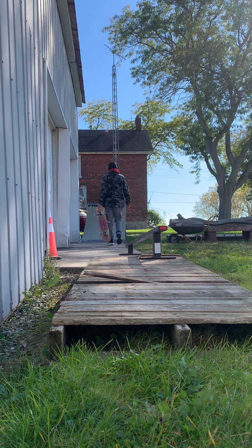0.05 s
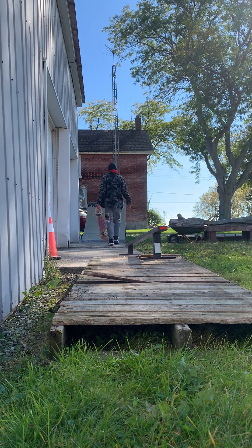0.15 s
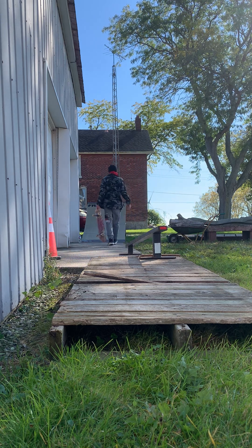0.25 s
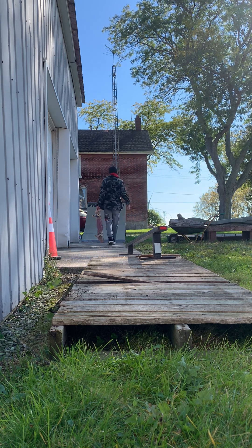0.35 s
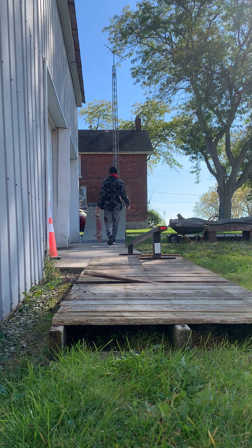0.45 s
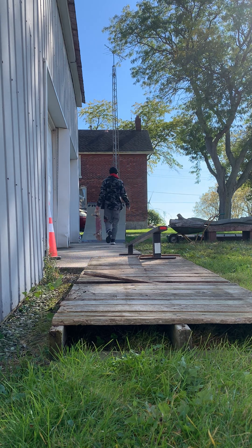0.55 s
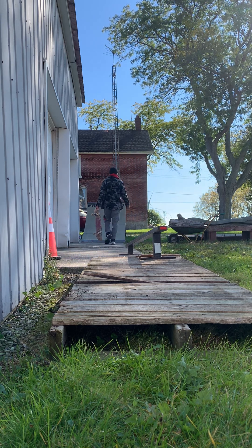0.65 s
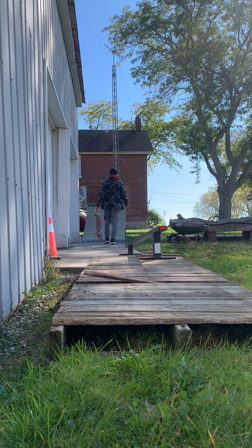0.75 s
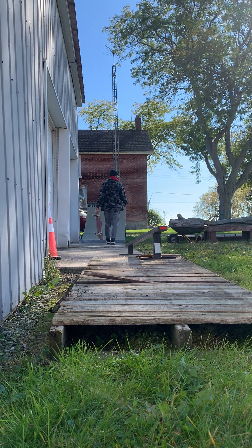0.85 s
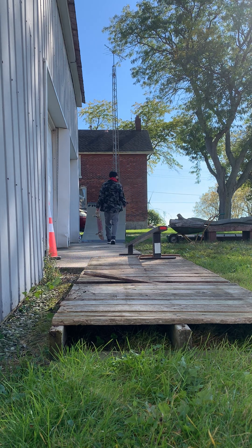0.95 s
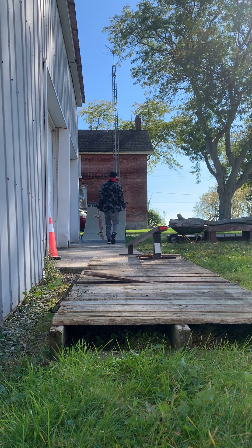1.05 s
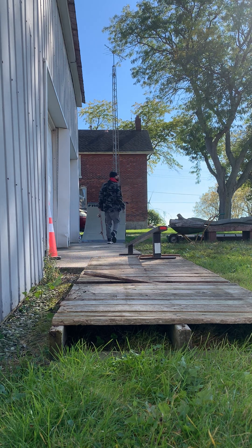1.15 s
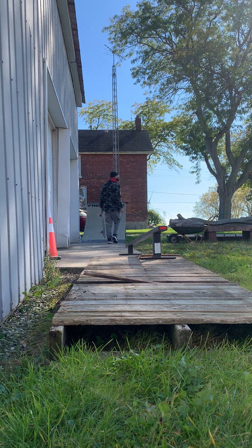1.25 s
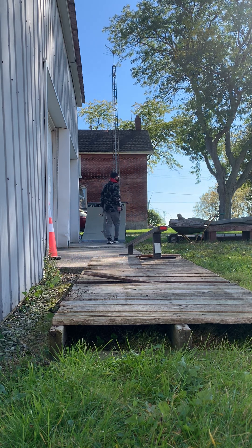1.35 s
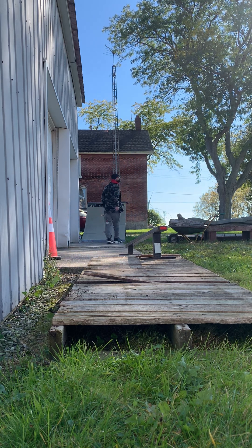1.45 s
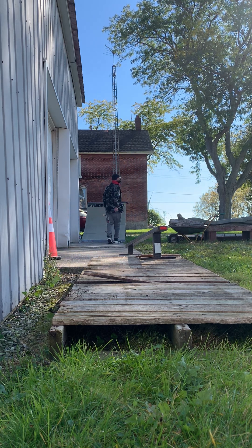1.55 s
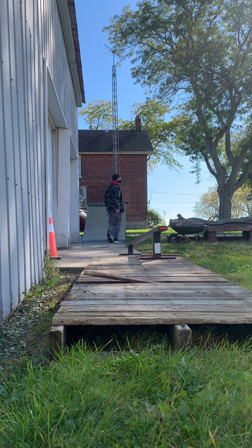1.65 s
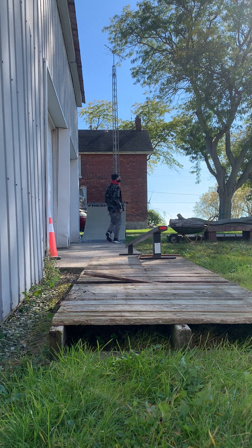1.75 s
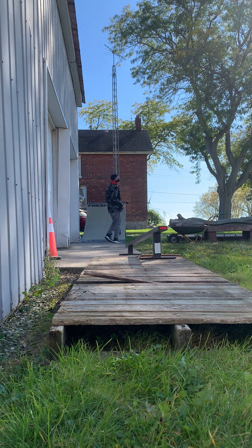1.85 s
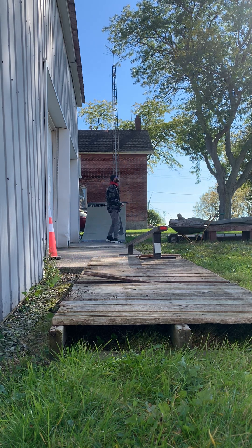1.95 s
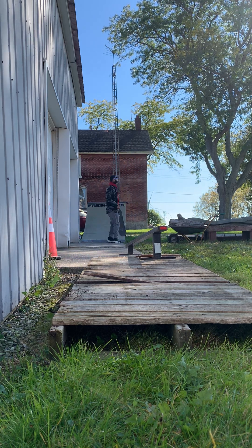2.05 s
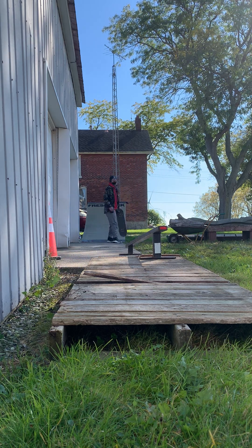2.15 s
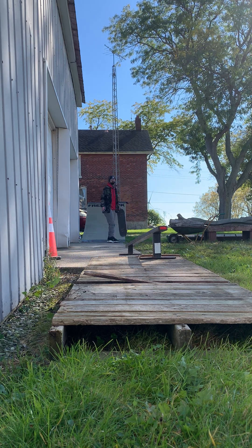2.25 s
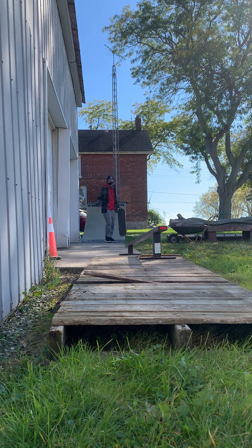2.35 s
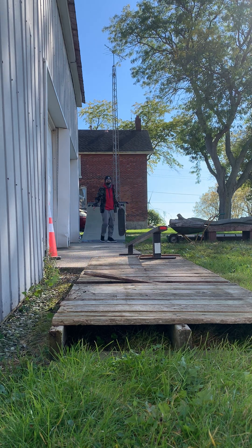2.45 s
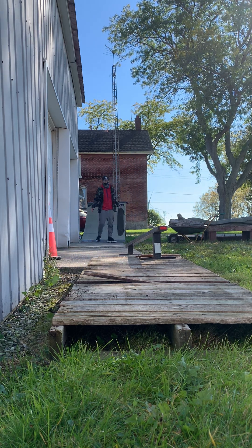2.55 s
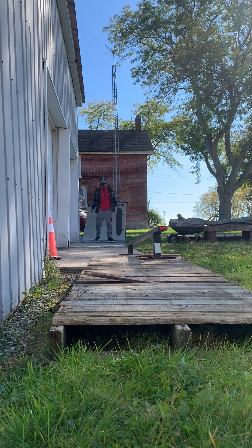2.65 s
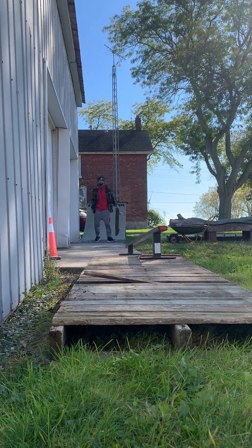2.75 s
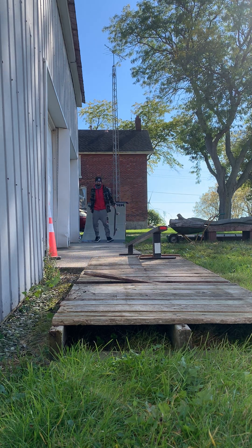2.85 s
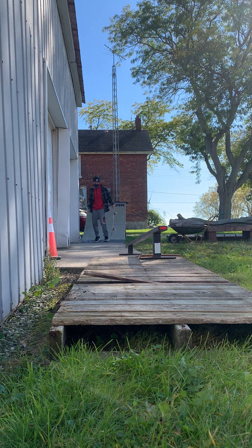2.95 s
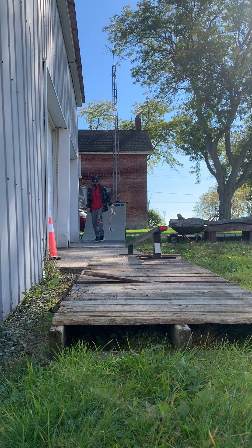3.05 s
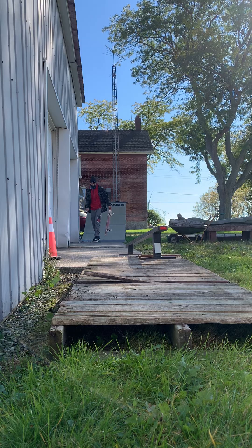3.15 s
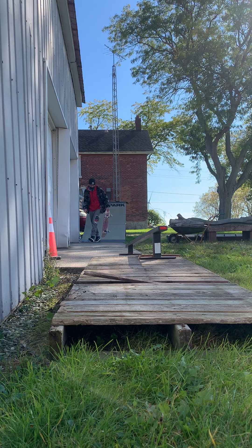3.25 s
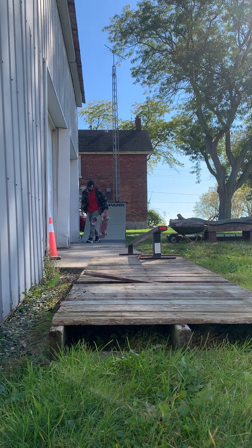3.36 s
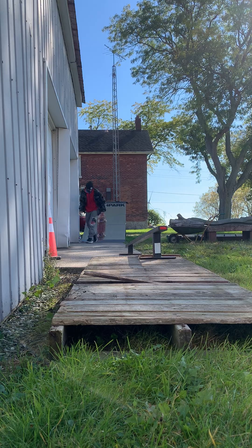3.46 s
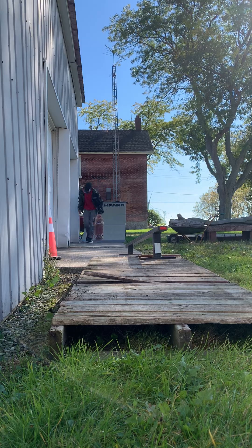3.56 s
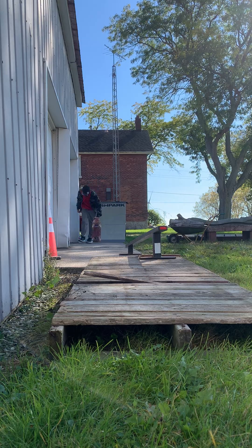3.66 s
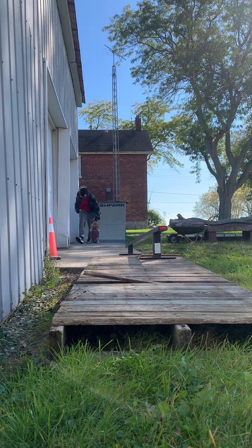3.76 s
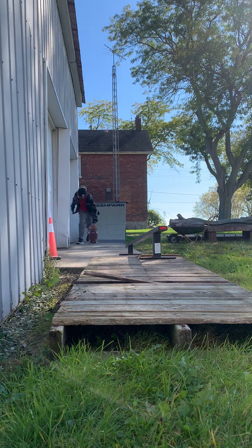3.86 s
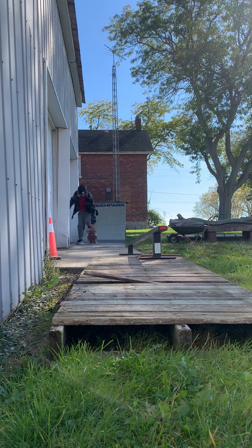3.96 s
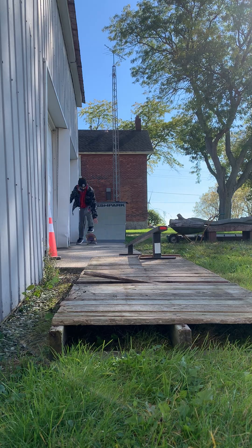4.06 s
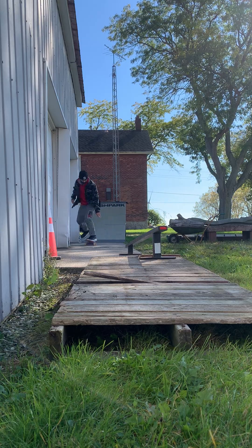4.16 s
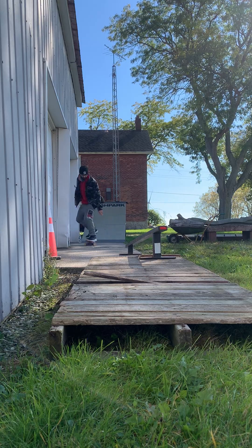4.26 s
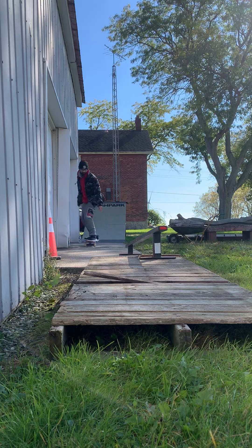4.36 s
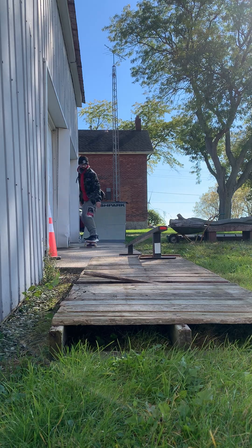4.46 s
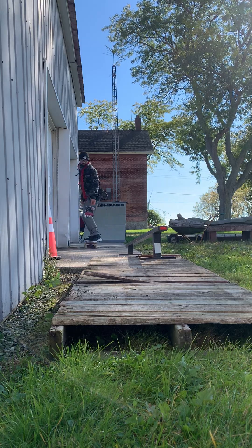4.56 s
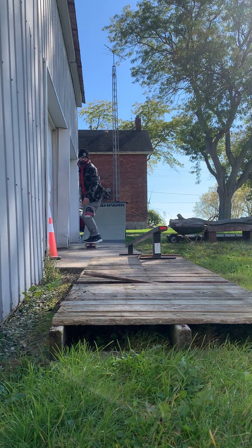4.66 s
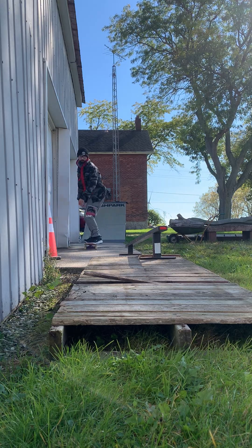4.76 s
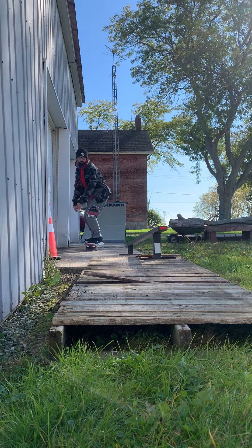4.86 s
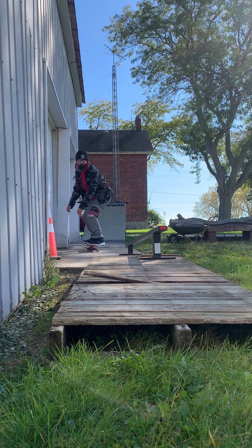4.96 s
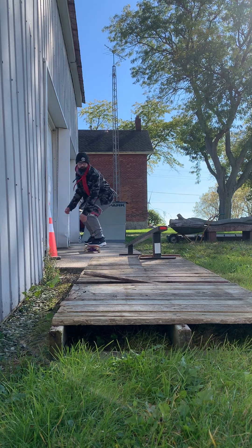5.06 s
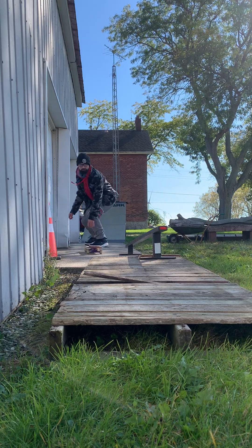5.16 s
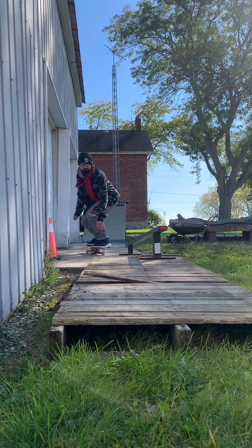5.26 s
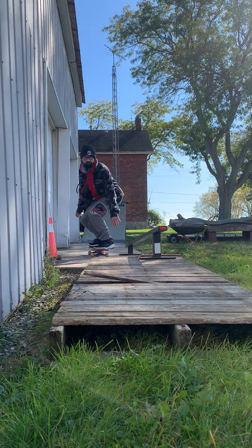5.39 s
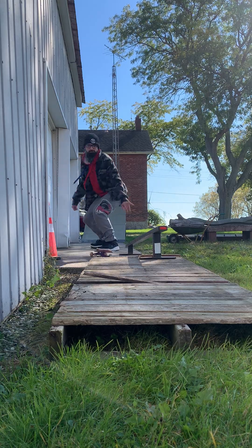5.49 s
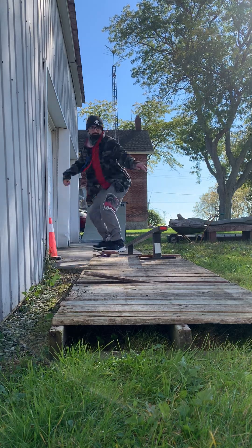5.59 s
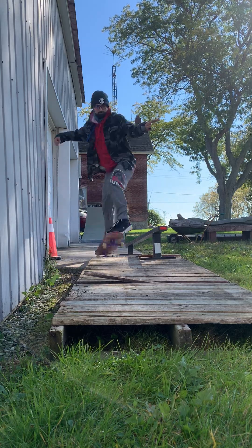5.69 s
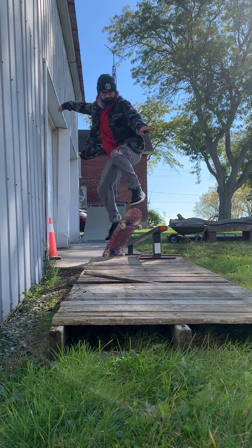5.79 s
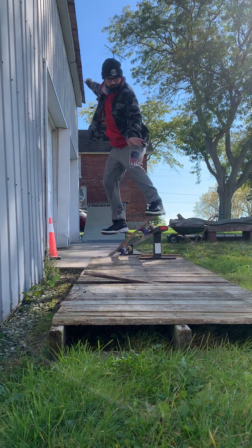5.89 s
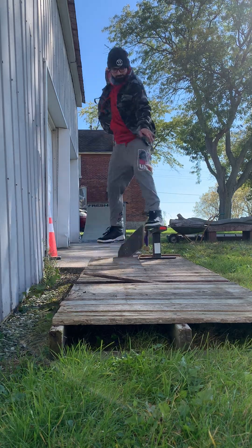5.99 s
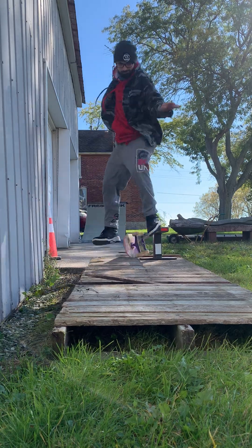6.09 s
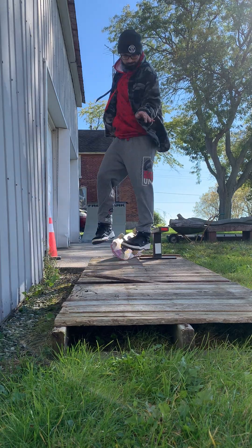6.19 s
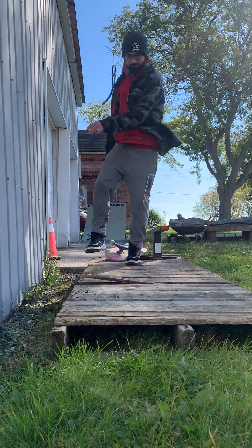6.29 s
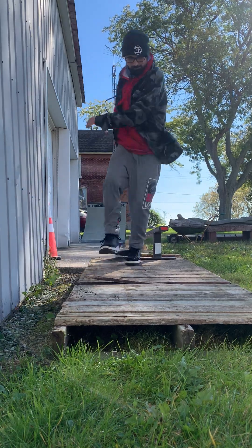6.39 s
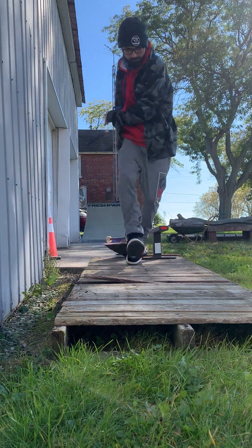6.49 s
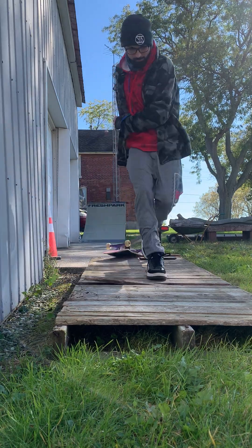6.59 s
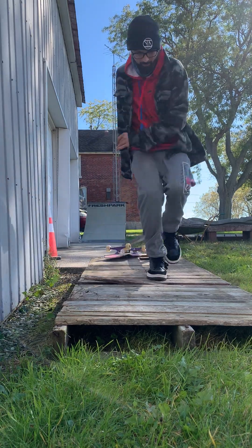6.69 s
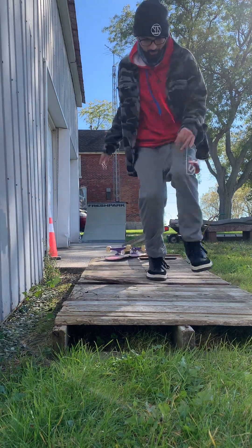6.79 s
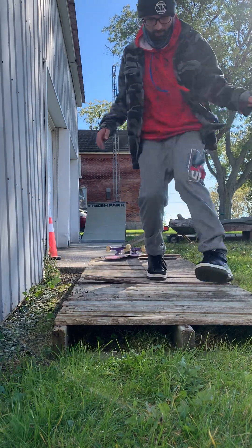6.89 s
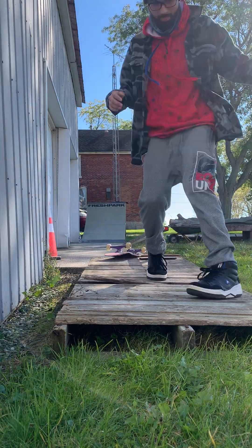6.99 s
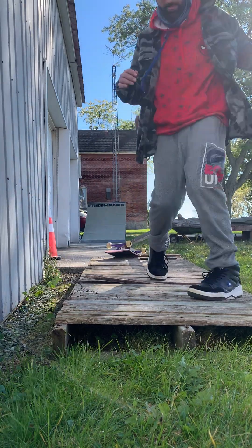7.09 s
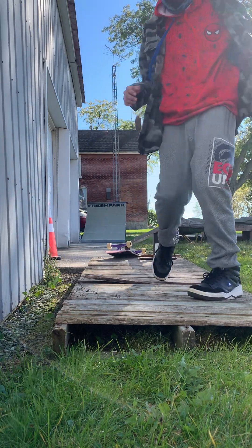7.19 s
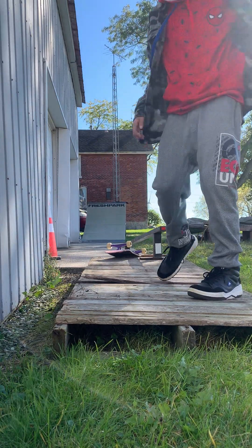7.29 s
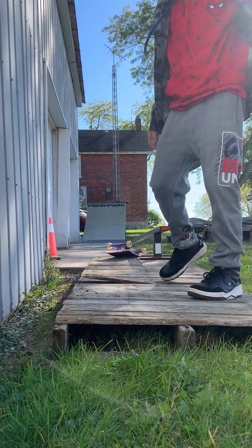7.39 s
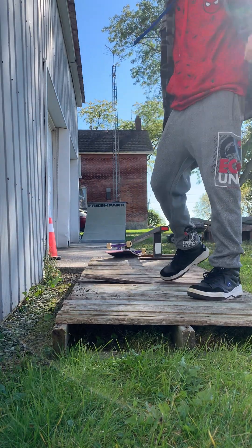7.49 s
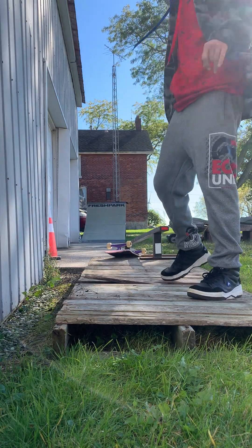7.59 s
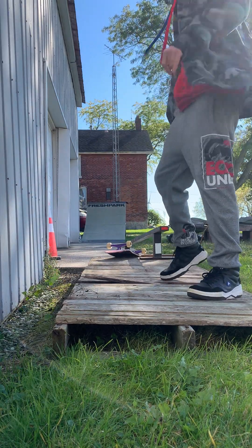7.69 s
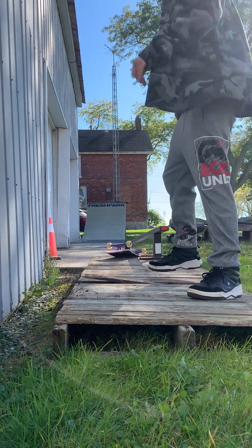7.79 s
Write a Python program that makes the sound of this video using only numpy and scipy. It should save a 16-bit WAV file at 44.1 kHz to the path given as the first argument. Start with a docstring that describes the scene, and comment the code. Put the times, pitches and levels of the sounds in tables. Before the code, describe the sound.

A ground-level phone outdoors picks up faint hiss, distant leaf rustle, nearly inaudible insect chirps and light wind, with soft low puffs around 1.2 to 2.7 seconds; the background shifts between muffled and open. A tiny knock comes at 2.8, then wooden taps at 3.7 to 4.0 and firmer knocks at 4.2, 4.35, 4.5 and 4.7. From about 3.9 hard wheels roll over gritty ground, with bearing hiss and a hollow deck drone growing nearer; a wind thump lands at 4.8. At 5.8 a sharp double crack pops the board, and the loudest crack hits at 5.9 with a touch of metal. More blows follow at 6.0 and 6.15. At 6.3 to 6.5 the board slams and clangs, rattling and scraping on a hollow steel rail. Loose knocks and strong wind thumps follow to 6.9, faint taps at 7.0 to 7.1, then wind fades by 7.8.

```python
"""A skateboard trick on a steel rail

Wind turbulence, puffs, rustle and chirps accompany a skateboard that rolls up to a phone on the ground by a shed,
flips, lands and clangs on a rail. Filtered noise forms wind, rustle, chirps and wheels; gliding sines form puffs.
Noise bursts excite damped resonances of the deck and of the rail. Rolling, rail, wind, rustle and chirps
switch between full and muffled below 8 kHz; blows, puffs and hiss are never muffled. The mono sum is widened.
"""
import sys
import numpy as np
from scipy import signal
from scipy.fft import rfft, irfft, next_fast_len
from scipy.io import wavfile
from scipy.ndimage import uniform_filter1d

SR = 44100
rng = np.random.default_rng(int(sys.argv[2]) if len(sys.argv) > 2 else 0)


def file_out(sig):
    """Save sig as 16-bit WAV at sys.argv[1]."""
    # one column per channel
    cols = np.atleast_2d(sig).T
    # limit, then scale
    lim = np.clip(cols, -1, 1)
    pcm = np.round(lim * 32767).astype(np.int16)
    wavfile.write(sys.argv[1], SR, pcm)


N = 345527
T = np.arange(N) / SR

# Wind turbulence at the microphone: t/s, mean level/dB
WIND = [(0, -43), (.3, -55), (2.6, -47.5), (3.1, -53.5), (3.6, -43.5), (3.85, -54.5), (4.9, -48.5),
        (6.7, -35.5), (7.2, -35), (7.84, -79.5)]
# Single puffs of wind: t/s, peak level/dB, settled f/Hz
BUFFETS = [(1.172, -30, 85), (1.469, -35, 58), (1.744, -34.5, 94), (2.094, -33, 66), (2.325, -31, 55),
           (2.532, -33.5, 54), (2.595, -41, 61.5), (2.705, -46, 70.4), (2.749, -49, 122), (3.568, -49, 106),
           (4.818, -25, 55), (6.661, -19, 87), (6.731, -23, 74.4), (6.875, -21, 53.2),
           (7.365, -52.5, 126.7)]
# Spectrum of leaves and far traffic: f/Hz, level/dB
AIR = [(100, -7.5), (300, -23), (700, -21.5), (1300, -19), (2000, -23), (3000, -43), (8000, -42),
       (16000, -58)]
# Spectrum of microphone noise: f/Hz, level/dB
HISS = [(60, -5), (250, -6.5), (600, -13.5), (1500, -15), (8000, -23), (16000, -47.5)]
# Wheels and tumbling board: t/s, treble level/dB, bass level/dB
ROLLING = [(3.86, -64, -81), (3.9, -44.5, -50), (3.95, -67, -61), (4.0, -47.5, -49), (4.15, -47, -54),
           (4.36, -40, -39), (4.5, -49, -46), (5.06, -49.5, -43.5), (5.55, -47, -41.5), (5.75, -43, -44),
           (6.1, -39, -33), (6.26, -44, -41), (6.45, -32, -35.5), (6.72, -42.5, -37.5), (6.85, -53.5, -61),
           (7.1, -51, -47)]
# Spectrum of wheels on gritty ground: f/Hz, level/dB
GRIT = [(500, -9), (1000, 1), (1700, 2), (2300, -4.5), (3200, -3), (4500, -10.5), (5800, -7.5), (7700, -26),
        (8200, -48)]
# Spectrum of the bearings: f/Hz, level/dB
BEARINGS = [(7900, -45), (8300, -3.5), (8800, -6.5), (10500, -16), (12000, -24.5), (16000, -38)]
# Deck driven by the wheels: f/Hz, bandwidth/Hz, level/dB
DRONE = [(597, 130, -3.5), (794, 220, -2.5)]
# Blows of board and shoes: t/s, knock, thud, snap and tick peak level/dB,
# tail t60/s before each band stretches it, knock f/Hz, thud f/Hz
KNOCKS = [(2.765, -66, -56, -84.5, -90, 0.094, 1200, 400), (3.743, -39, -53, -52.5, -94, 0.16, 1500, 625),
          (3.872, -43, -63, -62.5, -55, 0.34, 1660, 597), (3.964, -48, -78, -67, -47.5, 0.62, 795, 500),
          (4.179, -33.5, -39.5, -40, -36, .18, 1420, 386), (4.348, -28, -28, -31, -60, 0.14, 1490, 304),
          (4.53, -27, -26, -28.5, -58, .09, 1450, 560), (4.704, -27, -29, -36.5, -53, 0.11, 1040, 229),
          (5.792, -14, -25.5, -12, -47.5, 0.036, 1780, 410),
          (5.8, -12, -18.5, -13, -59.5, 0.075, 1670, 555), (5.856, -31, -29, -47.5, -60.5, .07, 1620, 305),
          (5.902, -3.5, -14, -5, -38.5, 0.24, 1674, 237), (6.017, -6, -8, -14.5, -48, 0.097, 2000, 437),
          (6.153, -25.5, -23, -50.5, -52, 0.38, 1600, 282), (6.311, -12, -11, -13.5, -45, 0.017, 960, 236),
          (6.499, -18, -15.5, -34.5, -56, 0.064, 1740, 576),
          (6.627, -31.5, -23.5, -27, -30.5, 0.125, 1203, 197),
          (7.034, -45.5, -50, -58, -39.5, 0.073, 803, 600), (7.113, -52, -42, -73, -54, 0.076, 1001, 590)]
# Bands of knock, thud, snap and tick: lower f/Hz, upper f/Hz
BLOW_BANDS = [(650, 2500), (140, 700), (2300, 7800), (8200, 13000)]
# Mean resonances of the deck: f/Hz, level/dB, t60/s
DECK = [(186.7, -2.5, 0.009), (269, -6.5, 0.17), (594.4, 7, 0.058), (845, -14, 0.012), (1190, -10, 0.074),
        (1640, 1.5, 0.016), (2750, 2, 0.042)]
# Board striking the rail: t/s, force level/dB, decay time/s, brightness/(dB per octave), favoured f/Hz
CLANGS = [(5.902, -14.5, .039, 8, 6005), (6.3, -5.5, 0.016, -1.5, 1166), (6.314, -9.5, .02, -2, 996),
          (6.366, -10.5, .03, -1.5, 1731), (6.387, -14, .01, -6.5, 454), (6.4, -11.5, .024, 2, 5469),
          (6.424, -12, .022, -0.5, 2161), (6.501, -20, 0.031, -6, 1254)]
# Resonances of the rail: f/Hz, peak level/dB, t60/s
RAIL = [(275, -21, 0.4), (454, -21, .7), (996, -20, 0.3), (1166, -24, 0.35), (1254, -31, 1.05),
        (1731, -27, 0.5), (1979, -25, .5), (2161, -25, .6), (2808, -17, 0.2), (3051, -17, 0.2),
        (3027, -23, 0.35), (3335, -23, 0.25), (5469, -29, 0.25), (6005, -33, .25), (8101, -41, .25)]
# Spans of full sound: start t/s, end t/s, openness/dB (summed, capped at full), swell time/s
OPEN = [(1.059, 1.183, 3, 0.0089), (1.456, 1.762, 2, .01), (2.068, 2.597, 4, .01), (4.247, 5.06, 7, 0.0085),
        (5.22, 5.502, -15.5, 0.3), (5.498, 6.941, 5, 0.0067), (7.21, 7.839, -12.5, 0.25)]
# Response of the muffled form: f/Hz, gain/dB
MUFFLED = [(40, -6), (150, -26), (350, -34.5), (600, -6), (850, -12), (1300, -16.5), (2000, -19),
           (4000, -34), (7900, -15.5), (8100, 2)]
# Stereo widening of a mono sound: f/Hz, left phase lead/rad, left minus right level/dB
WIDENING = [(1741, 0.06, -3.5), (2438, 2.02, -2.5), (2950, 0.9, 4.5), (3630, 1, 0.5), (4904, 3.67, 0),
            (16870, 20.82, 0)]

CHIRP_HZ, CHIRP_RATE_HZ, CHIRP_PEAK_S = 7200, 15.6, 1.3  # one chirp peaks at CHIRP_PEAK_S
CHIRP_DB = -88.5  # before muffling
BUFFET_S = 0.04
SILENT_DB = -130
ROLL_FROM_S, ROLL_TO_S, POP_S, LANDS_S = 2.7, 8.27, 5.75, 6.3  # the rider leaves the deck at the pop
BEARINGS_DB, FREE_SPIN_DB = -18.5, 7.5  # relative to the grit; added while the wheels spin in the air
DRONE_RIDDEN_DB, DRONE_LOOSE_DB = -0.5, -15  # relative to the rumble: at the pop, and after it
DRONE_RISE_DB_PER_S = 5  # the drone grows as the board nears
THUD_LAG_S = 0.003  # the planks answer a moment after the crack
FAVOURED_DB = 20  # extra drive for the resonance that a strike favours
MONO_BELOW_HZ = 900  # no phase lead or level difference below this
HEADROOM, TOP_HZ = 0.75, 16000


def undb(db):
    """Level law: an amplitude ratio is ten to the power dB / 20."""
    return 10 ** (np.asarray(db) / 20)


def level(x, db):
    """Root-mean-square principle: scale the signal's mean power to a level."""
    return x * undb(db) / np.sqrt(np.mean(x ** 2))


def curve(rows):
    """Linear interpolation: join each column's values over time."""
    s, *columns = np.transpose(rows)
    return [np.interp(T, s, column) for column in columns]


def colour(x, points):
    """Linear filtering: weight the spectrum by levels joined on a log-frequency axis."""
    size = next_fast_len(len(x) + 4096)
    hz, db = np.transpose(points)
    f = np.maximum(np.arange(size // 2 + 1) * SR / size, 1)
    gain = undb(np.interp(np.log(f), np.log(hz), db))
    return irfft(rfft(x, size) * gain, size)[:len(x)]


def band(x, lo_hz, hi_hz, order=2):
    """Band limitation: a Butterworth filter passes one range of frequency."""
    return signal.sosfilt(signal.butter(order, [lo_hz, hi_hz], "bandpass", fs=SR, output="sos"), x)


def ring(x, modes):
    """Modal superposition: x excites damped resonances, which add."""
    out = 0
    for hz, db, t60 in modes:
        r = np.exp(-np.log(1000) / (t60 * SR))
        w = 2 * np.pi * hz / SR
        out = out + undb(db) * signal.lfilter([0, r * np.sin(w)], [1, -2 * r * np.cos(w), r * r], x)
    return out


def walk(rate):
    """Random modulation: Gaussian values, rate of them per second, joined by ramps."""
    k = int(SR / rate)
    return uniform_filter1d(np.repeat(rng.standard_normal(N // k + 1), k), k)[:N]


def add(track, s, x):
    """Linear superposition: add an event to the track from time s."""
    i = int(s * SR)
    track[i:i + len(x)] += x[:len(track) - i]


def wind():
    """Turbulent pressure: lumpy low noise at the microphone, with a weaker, steadier edge reaching higher."""
    lumps = walk(18)
    flutter = undb(4.5 * lumps) * band(rng.standard_normal(N), 42, 110)
    edge = undb(1.4 * lumps - 19.5) * band(rng.standard_normal(N), 51, 240)
    return level(flutter + edge, 0) * undb(curve(WIND)[0])


def outdoors():
    """Amplitude modulation: far rustle swells a little, and narrow noise pulses as an insect's chirps."""
    air = level(colour(rng.standard_normal(N), AIR), -63) * undb(1.4 * walk(4.1))
    beat = np.maximum(np.cos(2 * np.pi * CHIRP_RATE_HZ * (T - CHIRP_PEAK_S)), 0) ** 2
    chirps = beat * band(rng.standard_normal(N), CHIRP_HZ - 60, CHIRP_HZ + 60)
    return air + level(chirps, CHIRP_DB)


def microphone_hiss():
    """Stationary random noise: the microphone's own steady, coloured hiss."""
    return level(colour(rng.standard_normal(N), HISS), -76.5)


def buffets():
    """Transient displacement: each puff swings the diaphragm for a few cycles of falling frequency."""
    out, t = np.zeros(N), np.arange(int(BUFFET_S * SR)) / SR
    for s, db, hz in BUFFETS:
        glide = 0.0067 * (1 - np.exp(-t / 0.0048))
        swing = np.sin(2 * np.pi * hz * (t + glide))
        swing = swing * np.sin(np.pi * (t / BUFFET_S) ** 0.62)
        add(out, s, undb(db) * swing / np.abs(swing).max())
    return out


def roll(tick_db=1.72):
    """Roughness excitation: hard wheels on grit give uneven ticks, bearing hiss, deck drone and rumble."""
    silent = (SILENT_DB, SILENT_DB)
    grit_db, rumble_db = curve([(ROLL_FROM_S, *silent), *ROLLING, (ROLL_TO_S, *silent)])
    spinning = (T > POP_S) & (T < LANDS_S)
    bearings_db = grit_db + BEARINGS_DB + FREE_SPIN_DB * spinning
    ridden_db = DRONE_RIDDEN_DB + DRONE_RISE_DB_PER_S * (T - POP_S)
    drone_db = rumble_db + np.where(T < POP_S, ridden_db, DRONE_LOOSE_DB)

    tick_size = rng.exponential(size=N // 32 + 1).repeat(32)[:N]
    ticks = rng.standard_normal(N) * undb(tick_db * tick_size)
    bumps = walk(35)  # uneven ground shakes every part together
    drone = sum(undb(db) * band(ticks, hz - width / 2, hz + width / 2) for hz, width, db in DRONE)

    bearings = level(colour(ticks, BEARINGS), 0) * undb(bearings_db + 1.9 * bumps)
    grit = level(colour(ticks, GRIT), 0) * undb(grit_db + 2.4 * bumps)
    drone = level(drone, 0) * undb(drone_db + 0.59 * bumps + 2.7 * walk(45))
    rumble = level(band(ticks, 81, 455), 0) * undb(rumble_db + 3.0 * bumps + 4.7 * walk(28))
    return bearings + grit + drone + rumble


def blows(crack_s=0.0066, rise_s=0.003, tail_db=-8.5, body_cycles=11, body_db=0):
    """Impact excitation: a crack rings the deck, with a noisy tail off shed and planks; ticks die first."""
    out, t = np.zeros(N), np.arange(int(0.4 * SR)) / SR
    rise = (1 - np.exp(-t / rise_s)) ** 2
    # in the order knock, thud, snap, tick
    stretches = (1.28, 1.3, 1.5, 0.27)  # multiples of the tail t60
    deck_shares = (0.3, 0.06, 0.74, 0.063)
    for s, *peak_db, t60, knock_hz, thud_hz in KNOCKS:
        noise = rng.standard_normal((2, len(t)))
        spot = rng.standard_normal((len(DECK), 2))
        # every blow lands elsewhere, so the deck rings a little differently
        modes = [(hz * (1 + 0.04 * a), db + 3.0 * b, d) for (hz, db, d), (a, b) in zip(DECK, spot)]
        deck = ring(noise[0] * rise * np.exp(-t / crack_s), modes)
        deck = deck / np.abs(deck).max()
        pitches = (knock_hz, thud_hz, None, None)
        for (lo, hi), db, stretch, share, hz in zip(BLOW_BANDS, peak_db, stretches, deck_shares, pitches):
            fade = np.exp(-(t / crack_s) ** 2) + undb(tail_db - 60 * t / (stretch * t60))
            part = band(share * deck + 0.75 * noise[1] * fade * rise, lo, hi, order=3)
            if hz:  # the struck wood rings at its own pitch
                body = ring(part, [(hz, 0, body_cycles / hz)])
                part = part / np.abs(part).max() + undb(body_db) * body / np.abs(body).max()
            lag = THUD_LAG_S * (lo < 300)
            add(out, s - 1.2 * rise_s + lag, undb(db) * part / np.abs(part).max())
    return out


def rail(rise_s=0.003):
    """Modal excitation: chattering forces drive a hollow steel rail's long rings and a direct scrape."""
    out, forces = np.zeros(N), np.zeros((len(CLANGS), N))
    t = np.arange(int(0.4 * SR)) / SR
    for track, (s, db, length, tilt_db, _) in zip(forces, CLANGS):
        force = rng.standard_normal(len(t)) * (1 - np.exp(-t / rise_s)) * np.exp(-t / length)
        rattle = rng.standard_normal(len(t) // 150 + 1).repeat(150)
        force = force * undb(4.3 * uniform_filter1d(rattle, 60)[:len(t)])  # it rattles unevenly
        force = force * undb(db) / np.sqrt(np.sum(force ** 2))
        scrape = undb(31) * band(force, 2400, 3900)
        scrape = scrape + undb(26.5) * band(force, 150, 1200)
        scrape = scrape + undb(11.5 + 0.7 * tilt_db) * band(force, 4500, 9700, order=4)
        add(out, s - rise_s, scrape)
        add(track, s - rise_s, force)

    *_, tilt_db, favoured_hz = np.transpose(CLANGS)
    for hz, db, t60 in RAIL:
        near = np.abs(np.log(favoured_hz / hz)) < 0.03
        drive = undb(tilt_db * np.log2(hz / 2000) + FAVOURED_DB * near) @ forces
        tone = ring(drive, [(hz, 0, t60)])
        out += undb(db) * tone / np.abs(tone).max()
    return out


def muffle(x, fade_s=0.013):
    """Time-varying filtering: crossfade the full sound with a form dulled below 8 kHz."""
    dull = colour(x, MUFFLED)
    share = sum(undb(db) * np.clip((T - start) / swell, 0, 1) * (T < end) for start, end, db, swell in OPEN)
    share = uniform_filter1d(np.minimum(share, 1), int(fade_s * SR))
    return dull + share * (x - dull)


def widen(x, stray):
    """Stereo widening: left and right differ in phase and level by frequency, plus an antiphase late copy."""
    size = next_fast_len(N + 4096)
    hz, lead, tilt_db = np.c_[[MONO_BELOW_HZ, 0, 0], np.transpose(WIDENING)]
    f = np.arange(size // 2 + 1) * SR / size
    half = np.exp(0.5j * np.interp(f, hz, lead)) * undb(np.interp(f, hz, tilt_db) / 2)
    pair = irfft(rfft(x, size) * np.array([half, 1 / half]), size)[:, :N]
    late = band(np.roll(x, 331), 800, 14000, order=4)  # 7.5 ms later
    return pair + stray * np.array([late, -late])


def scene():
    """Superposition: muffled and unmuffled sources add to a mono sound, which is then widened."""
    switched = muffle(wind() + outdoors() + roll() + rail())
    return widen(switched + microphone_hiss() + buffets() + blows(), stray=0.2)


def record(dry):
    """Band limitation and saturation: the phone cuts deep bass, rounds loud peaks and cuts the top."""
    dry = signal.sosfilt(signal.butter(3, 38, "highpass", fs=SR, output="sos"), dry)
    rounded = np.tanh(HEADROOM * dry) / HEADROOM
    return signal.sosfilt(signal.ellip(10, 0.2, 95, TOP_HZ, fs=SR, output="sos"), rounded)


dry = scene()
out = record(dry)
file_out(out)
```